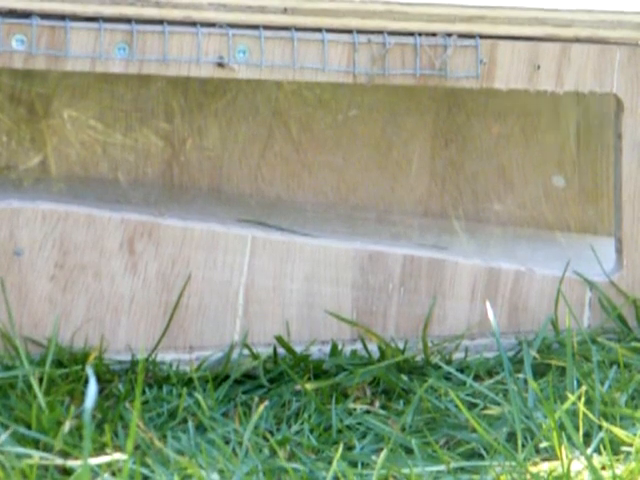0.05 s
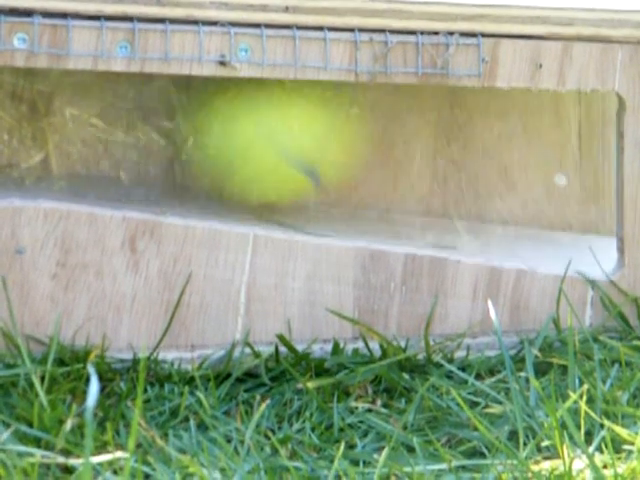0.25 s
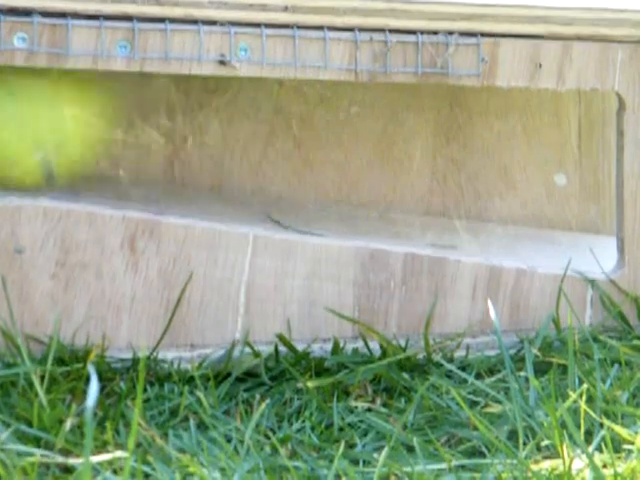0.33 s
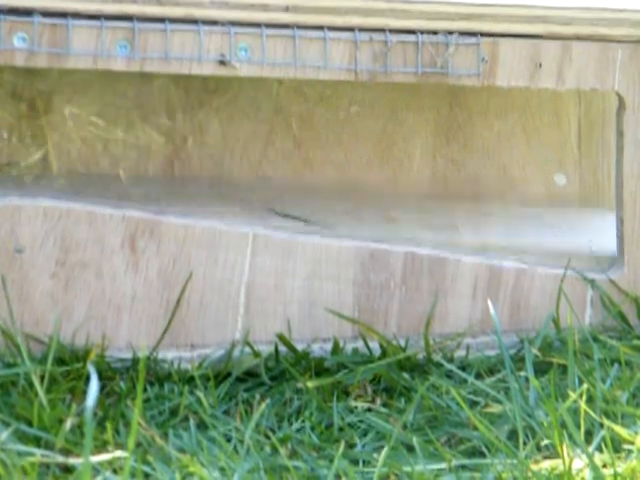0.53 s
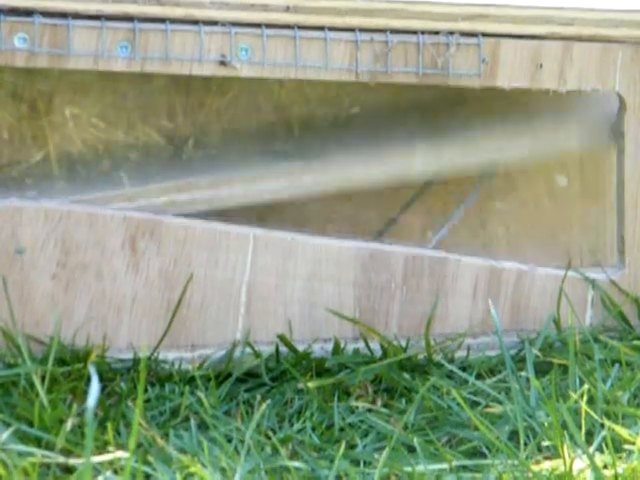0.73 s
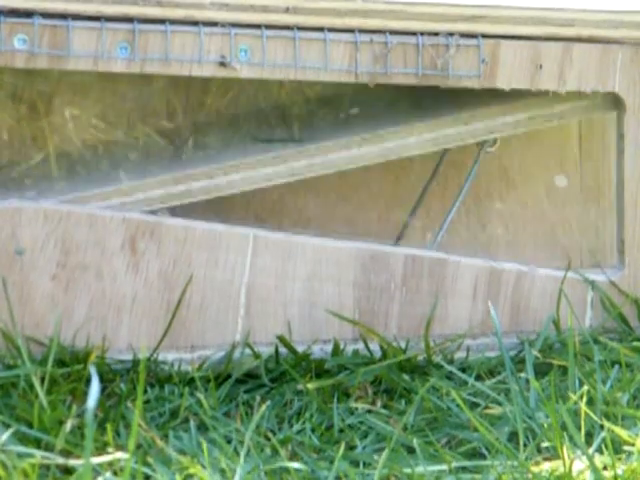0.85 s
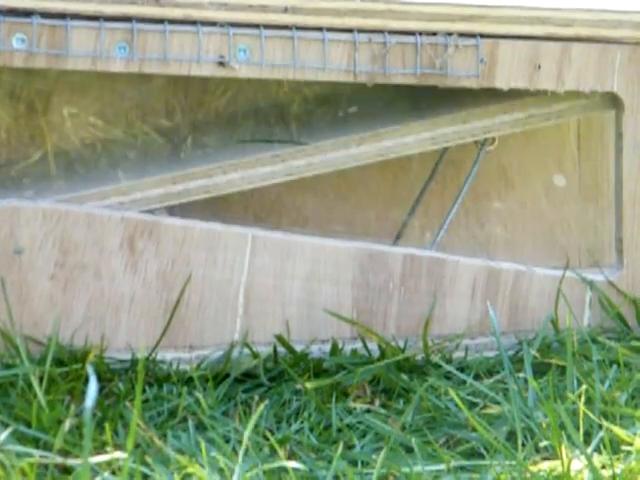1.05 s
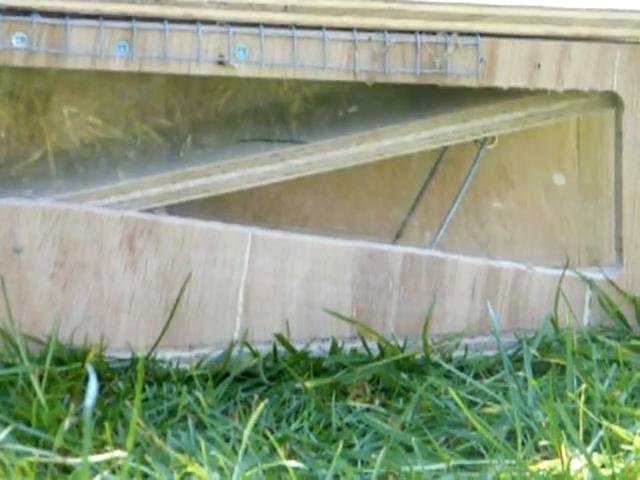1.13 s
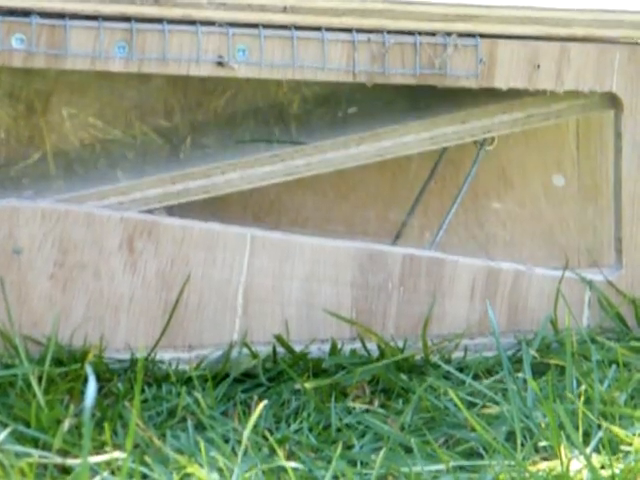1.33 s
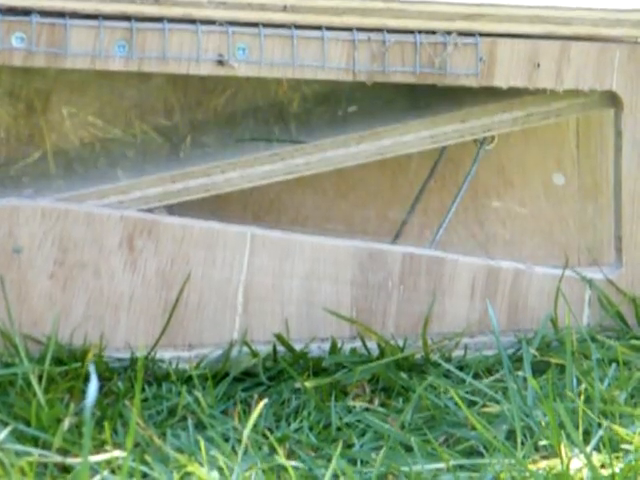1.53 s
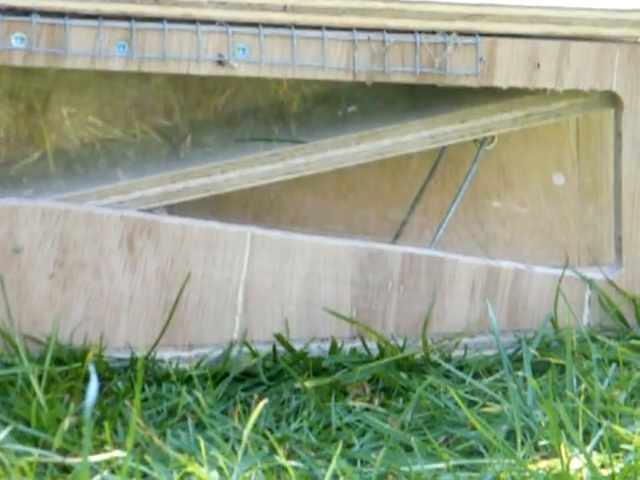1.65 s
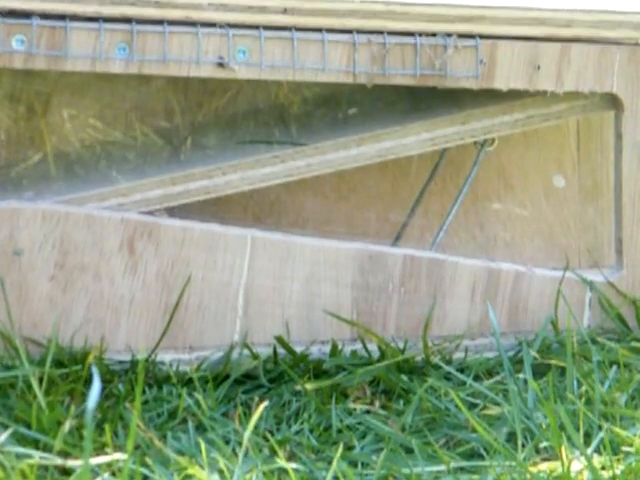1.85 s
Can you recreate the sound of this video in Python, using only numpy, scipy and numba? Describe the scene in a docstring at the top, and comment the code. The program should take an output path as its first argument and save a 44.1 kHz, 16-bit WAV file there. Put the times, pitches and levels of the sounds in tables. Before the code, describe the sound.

A ball knocks into a rattling wooden trap, then its ramp slams and settles.

```python
"""A box booms and its wire fittings rattle: a tennis ball has dropped into a plywood trap on a lawn, close to
the microphone. The ball bounces away softly; the sprung ramp tips up, slams against the frame twice and
settles. Each impact excites damped modes of the boards, and the shaken wire rings through many tiny contacts. A
soft rustle swells and fades over a steady outdoor hiss, and the loudest peaks are cut flat at full scale."""
import sys
import numpy as np
from scipy import signal
from scipy.fft import rfft, irfft
from scipy.io import wavfile
from scipy.ndimage import uniform_filter1d
from numba import njit

SR = 44100
rng = np.random.default_rng(int(sys.argv[2]) if len(sys.argv) > 2 else 0)


def unload_wav(signal):
    """Save mono or channel-first audio to the path in sys.argv[1] as 16-bit WAV at rate SR, clipped to [-1, 1]."""
    wavfile.write(
        sys.argv[1],
        SR,
        np.round(np.clip(np.atleast_2d(signal).T, -1, 1) * 32767).astype(np.int16),
    )


N = 83790


def undb(db):
    """Amplitude ratio of a level in decibels."""
    return 10 ** (np.asarray(db) / 20)


def unit(x):
    """Normalisation to rms 1."""
    return x / np.sqrt(np.mean(x ** 2))


def clock():
    """Time of every sample in seconds."""
    return np.arange(N) / SR


def add(out, start_s, x):
    """Superposition: a sound joins the mix at its onset."""
    i = int(start_s * SR)
    out[i:i + len(x)] += x[:N - i]


def rolloff(x, order, cutoff_hz, kind="low"):
    """Maximally flat filter, falling 6 dB an octave per order beyond the cutoff."""
    return signal.sosfilt(signal.butter(order, cutoff_hz, kind, fs=SR, output="sos"), x)


def colour(x, spectrum):
    """Minimum-phase filter shaped by (frequency_hz, level_db) points; white noise keeps its power."""
    size = 4096
    hz, db = np.array(spectrum, float).T
    bins_hz = np.maximum(np.fft.rfftfreq(size, 1 / SR), 1)
    magnitude = undb(np.interp(np.log(bins_hz), np.log(hz), db))
    cepstrum = irfft(np.log(magnitude))
    cepstrum[1:size // 2] *= 2  # folding the cepstrum makes the filter causal
    cepstrum[size // 2 + 1:] = 0
    response = irfft(np.exp(rfft(cepstrum)))
    return signal.fftconvolve(x, response / np.linalg.norm(response))[:len(x)]


def fade(t60_s):
    """Exponential damping over half a second, at 60 dB per t60_s."""
    return np.exp(-np.log(1000) * clock()[:SR // 2] / max(t60_s, 1e-3))


def gate(start_s, length_s, release_s, attack_s=0.0043):
    """Burst envelope: a linear rise, and exponential decay after length_s."""
    t = clock() - start_s
    return np.clip(t / attack_s, 0, 1) * np.exp(-np.maximum(t - length_s, 0) / release_s)


def clicks(per_s):
    """Shot noise: tiny independent contacts of random sign and strength, rms 1."""
    hits = rng.random(N) < per_s / SR
    return unit(hits * rng.choice([-1, 1], N) * undb(2.9 * rng.standard_normal(N)))


def flicker(rate_hz):
    """Slow random modulation: straight lines between random values, rms 1."""
    step = int(SR / rate_hz)
    stairs = np.repeat(rng.standard_normal(N // step + 1), step)
    return unit(uniform_filter1d(stairs, step)[:N])


def ring(modes, contact_ms=0):
    """Modal superposition: a struck body sounds damped sines; longer contact weakens the high ones."""
    t = clock()[:SR // 2]
    out = np.zeros(len(t))
    for k, (hz, db, t60_s) in enumerate(modes):
        excitation = 1 / np.hypot(1, (hz * contact_ms / 1000) ** 2)
        out += (-1) ** k * undb(db) * excitation * fade(t60_s) * np.sin(2 * np.pi * hz * t)
    return out


def punch(pitch_hz, t60_s):
    """Damped oscillator: the struck spot of a board gives way and springs back for a few cycles."""
    return ring([(pitch_hz, 0, t60_s)])


def crack(spectrum, bass_t60_s, treble_t60_s, tail_db, tail_t60_s):
    """Modal overlap: plywood's crowded modes merge into brief noise, with a weak tail inside the box."""
    noise = rng.standard_normal((3, SR // 2))
    bass = rolloff(noise[0], 2, 1500) * fade(bass_t60_s)
    tail = rolloff(noise[1], 1, 2200) * fade(tail_t60_s)
    treble = rolloff(noise[2], 2, 1500, "high") * fade(treble_t60_s)
    return colour(bass + treble + undb(tail_db) * tail, spectrum)


def air():
    """Broadband noise: steady outdoor hiss over a low rumble that slowly eases."""
    # outdoor noise spectrum: frequency_hz, level_db
    spectrum = [(15, -79), (25, -21), (73, -1), (99, 2), (140, 2), (215, -5.5), (305, -12), (445, -15),
                (523, -11), (762, -13), (848, -12), (1620, -12.5), (2120, -11), (4260, -13), (4750, -14),
                (6380, -13), (7910, -33.5), (8810, -34), (15500, -44.5)]
    noise = unit(colour(rng.standard_normal(N), spectrum))
    rumble = signal.sosfiltfilt(signal.butter(2, 450, fs=SR, output="sos"), noise)
    hiss = noise - rumble
    rumble_db = 0.76 - 1.8 * clock() + 0.2 * flicker(rate_hz=10.7)
    return undb(-39.5) * (hiss + rumble * undb(rumble_db))


def rustle():
    """Modulated shot noise: a fine, high rustle, as of something sliding through grass."""
    # rustle spectrum: frequency_hz, level_db
    spectrum = [(500, -7.5), (2500, -24.5), (4200, -5.5), (5900, 0.5), (7000, -2), (8700, -7.5),
                (11000, -15), (15500, -20)]
    # swell and fade: time_s, level_db
    envelope = [(0.74, -50), (0.86, -44), (0.93, -39.5), (0.965, -50), (1.04, -35.5), (1.13, -30),
                (1.2, -41.5), (1.301, -42.5), (1.391, -39), (1.52, -43), (1.7, -47), (1.9, -48)]
    swell_db = np.interp(clock(), *np.array(envelope).T)
    return colour(clicks(per_s=12000), spectrum) * undb(swell_db + 0.33 * flicker(rate_hz=38.6))


def scuff():
    """Gated shot noise: a brief brush just before the ball lands."""
    # brush spectrum: frequency_hz, level_db
    spectrum = [(300, -2), (900, -13), (1300, 6), (1550, -1), (1800, 1), (2350, 5), (3000, -14),
                (4600, 7.5), (5300, 4), (6500, 1), (8500, -12), (15000, -44)]
    contacts = clicks(per_s=4000) * gate(start_s=0.11, length_s=0.011, release_s=0.0058)
    return undb(-27.5) * colour(contacts, spectrum)


def swing():
    """Sliding friction: the rising ramp rubs faintly along the walls, most just before it slams."""
    # friction spectrum: frequency_hz, level_db
    spectrum = [(100, -20), (330, -2), (750, 5), (1400, 2), (3000, 2), (4400, 4), (5500, -2), (12000, -42)]
    peak_s, width_s = 0.878, 0.087
    swell = np.exp(-0.5 * ((clock() - peak_s) / width_s) ** 2)
    return undb(-38.5) * colour(clicks(per_s=2600), spectrum) * swell


def thuds():
    """Cavity resonance: soft bumps sound only the hollow of the box."""
    # bumps that shake the whole box: start_s, level_db, contact_ms
    bumps = [(0.122, -24, 2.3), (0.456, -9.5, 2.7), (0.470, -11, 0.98), (0.5374, 4, 2.6),
             (0.602, -13.5, 1.2), (0.706, -13.5, 1.9), (0.8745, -0.5, 0.66), (0.9869, 1, 0.78),
             (1.0414, 1.5, 0.53), (1.103, -11, 1.3), (1.18, -12, 3.1), (1.211, -15.5, 2.7),
             (1.367, -16.5, .5)]
    # modes of the hollow: pitch_hz, level_db, t60_s
    modes = [(244.7, -10.5, 0.28), (322.4, 4, 0.12), (405, -12.5, 0.18), (477, -5, 0.077), (745, -13, 0.14),
             (870, -3, 0.013)]
    out = np.zeros(N)
    for start_s, level_db, contact_ms in bumps:
        add(out, start_s, undb(level_db - 23.5) * ring(modes, contact_ms))
    return out


def wires():
    """Repeated impact: shaken wire buzzes and chatters against the wood, and each contact rings it."""
    # bursts of chatter, each strongest in one band: start_s, level_db, length_s, band_hz
    rattles = [(0.2395, 9, 0.0038, 5840), (0.2535, 0.5, 0.0079, 3930), (0.266, -0.5, 0.015, 3960),
               (0.282, -16, 0.0034, 6440), (0.294, 2, 0.013, 3820), (0.315, -6.5, 0.013, 4370),
               (0.331, -0.5, 0.0037, 6500), (0.343, -1, 0.0043, 6600), (0.3484, 1, 0.0037, 6400),
               (0.36, -3, 0.0035, 6670), (0.379, -1, 0.0075, 3860), (0.403, -10, 0.017, 6540),
               (0.424, -12, 0.016, 6360), (0.5337, -13, 0.0059, 6600), (0.6, -14.5, 0.0058, 6100),
               (0.721, -10, 0.0037, 6350), (0.913, -1, 0.0076, 4200), (0.924, -3, 0.012, 2580)]
    # modes of the wire: pitch_hz, level_db, t60_s
    modes = [(1473, -2, 0.069), (1882, -0.5, .07), (2540, -2, 0.087), (2555, 6.5, 0.068),
             (3480, -4.5, 0.13), (3910, -6, 0.095), (4144, -1, 0.088), (4220, -2.5, 0.12), (4400, -3, 0.08),
             (5800, 4, .03), (5840, 2, 0.016), (6700, 3.5, 0.055)]
    # contact noise spectrum: frequency_hz, level_db
    spectrum = [(300, 2), (1000, 0), (1600, -8.5), (2500, -2.5), (3150, -7.5), (4000, 2), (5200, -3.5),
                (6600, 4), (8200, -12), (10000, -13.5), (15000, -21)]
    buzz_start_s, hold_s, fall_db_per_s = 0.2325, 0.13, 134
    t = clock() - buzz_start_s
    buzz_db = -5.5 - fall_db_per_s * np.maximum(t - hold_s, 0)
    contacts = clicks(per_s=1100) * (t > 0) * undb(buzz_db)
    taps = clicks(per_s=1100)
    for start_s, level_db, length_s, band_hz in rattles:
        burst = undb(level_db) * gate(start_s, length_s, release_s=0.0025) * taps
        band = signal.lfilter(*signal.iirpeak(band_hz, Q=5.3, fs=SR), burst)
        contacts += burst + undb(6.5) * band
    metal = ring(modes)
    ringing = signal.fftconvolve(contacts, metal / np.linalg.norm(metal))[:N]
    return undb(-31) * ringing + undb(-25.5) * colour(contacts, spectrum)


def ramp():
    """Inelastic rebound: the ramp hits the frame edge after edge, ever duller, each spot with its clack."""
    # blows on the frame: start_s, ring_db, contact_ms, crack_db, clack_hz, cutoff_hz
    blows = [(0.9028, -17.5, .3, -5, 1010, 8000), (0.9048, -1, 0.3, 4, 587, 8000),
             (0.9860, -13.5, 0.44, -2.5, 761, 3500), (0.9899, -14, 0.45, -3, 903, 3000),
             (1.0416, -21.5, 0.69, -16, 700, 1500)]
    # modes of the ramp: pitch_hz, level_db, t60_s
    modes = [(245.2, -9.5, 0.75), (363, 2.5, 0.37), (420, -14, 0.6), (479, -12, 0.029), (527, 2, 0.11),
             (632, 2, 0.16), (671, -10, 0.43), (937, -3, 0.099), (1020, 3, 0.098), (1150, -6, 0.024),
             (1430, -4, 0.075), (1660, -3, 0.094), (2598, -21, 0.26)]
    # spectrum of the ramp's crack: frequency_hz, level_db
    spectrum = [(30, -31), (130, -11), (280, -1), (520, -7), (980, -3), (1300, -10.5), (1580, -10.5),
                (2200, -15), (2700, -14), (4000, -17), (6000, -21.5), (11000, -33.5), (15500, -42)]
    out = np.zeros(N)
    for start_s, ring_db, contact_ms, crack_db, clack_hz, cutoff_hz in blows:
        wood = crack(spectrum, bass_t60_s=0.036, treble_t60_s=0.065, tail_db=-12.5, tail_t60_s=0.24)
        wood = undb(-10.5) * rolloff(wood, 1, cutoff_hz)
        clack = undb(-3.5) * punch(clack_hz, t60_s=0.022)
        add(out, start_s, undb(ring_db - 16.5) * ring(modes, contact_ms))
        add(out, start_s, undb(crack_db) * (wood + clack))
    return out


def ball():
    """Impact excitation: the ball lands, the boards knock again as they rebound, and the box rings."""
    # blows on the box: start_s, ring_db, contact_ms, crack_db
    blows = [(0.2383, -1.5, 0.86, 1), (0.2415, -6, 0.46, 0), (0.26, -4.5, 0.57, -11.5),
             (0.3134, -16.5, 0.47, -9.5), (0.3505, -19.5, 1.8, -16.5), (0.386, -21, 3, -23.5)]
    # modes of the box: pitch_hz, level_db, t60_s
    modes = [(138, -31, .12), (190, -3, 0.1), (251.5, -11, 0.81), (306.9, -8, 0.45), (379, -11, 0.42),
             (409.3, -10, 0.48), (477, -7, 0.32), (519, 5, 0.06), (565, 0.5, 0.11), (679, -6, 0.23),
             (770, 6, 0.042), (1088, -14, 0.2), (1482, -20, 0.52), (1869.6, -6.5, 0.3)]
    # spectrum of the boards' crack: frequency_hz, level_db
    spectrum = [(30, -30), (90, -21), (190, -3), (330, 5.5), (570, -2), (800, -3), (1030, -4.5),
                (1250, -9.5), (1600, -9), (1900, -6), (2200, -14), (2650, -6.5), (3200, -10), (4100, -9.5),
                (5200, -12.5), (6200, -9.5), (8200, -21), (12200, -27), (15500, -42)]
    out = np.zeros(N)
    for start_s, ring_db, contact_ms, crack_db in blows:
        wood = crack(spectrum, bass_t60_s=0.056, treble_t60_s=0.035, tail_db=-13, tail_t60_s=0.45)
        knock = undb(1) * punch(pitch_hz=520, t60_s=0.03)
        add(out, start_s, undb(ring_db - 12.5) * ring(modes, contact_ms))
        add(out, start_s, undb(crack_db) * (undb(-5.5) * wood + knock))
    return out


def scene():
    """Superposition: the pressures of all sources add at one microphone."""
    knocks = rolloff(ball() + ramp(), 1, 88, "high")  # small boards radiate little bass
    return (knocks + swing() + thuds() + wires() + scuff() + rustle() + air())[None]


@njit
def follow(x, attack_s, release_s):
    """Envelope detection: a one-pole smoother with separate time constants for rise and fall."""
    out, level = np.empty(len(x)), 0.
    for i in range(len(x)):
        lag_s = attack_s if x[i] > level else release_s
        level += (x[i] - level) / (lag_s * SR)
        out[i] = level
    return out


def record(dry):
    """Filtering and compression: port notches, a gain that ducks after blows and a steep top cut."""
    # antiresonances of the microphone port: centre_hz, width_hz
    notches = [(4850, 414), (7780, 980)]
    threshold_db, duck_db_per_db, top_hz = -21.5, 0.1, 15650
    x = dry[0]
    for centre_hz, width_hz in notches:
        x = signal.lfilter(*signal.iirnotch(centre_hz, centre_hz / width_hz, fs=SR), x)
    level = follow(np.abs(x), attack_s=0.0092, release_s=0.66)
    gain = np.maximum(level / undb(threshold_db), 1) ** -duck_db_per_db
    x = np.clip(x * gain, -1, 1)  # the loudest peaks are cut flat at full scale
    return signal.sosfilt(signal.ellip(10, 0.1, 80, top_hz, fs=SR, output="sos"), x)[None]


dry = scene()
out = record(dry)
unload_wav(out)
```